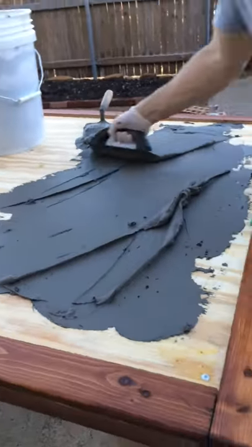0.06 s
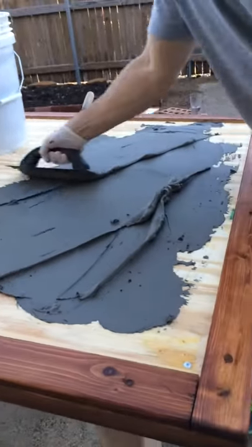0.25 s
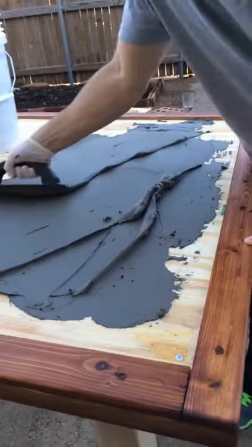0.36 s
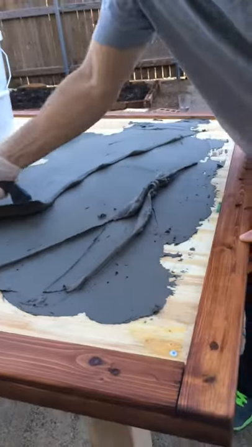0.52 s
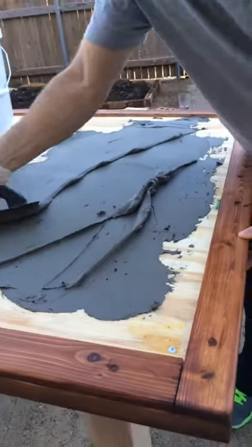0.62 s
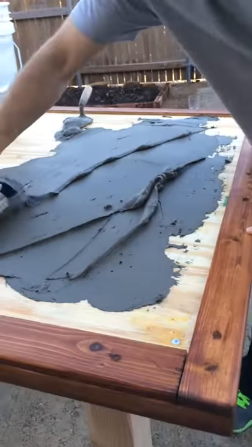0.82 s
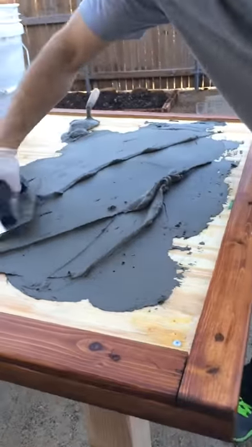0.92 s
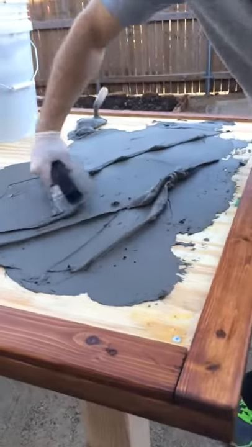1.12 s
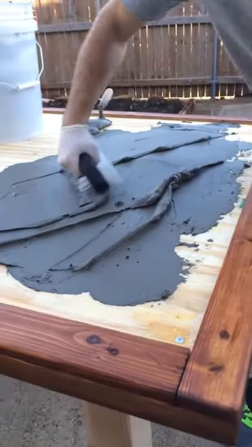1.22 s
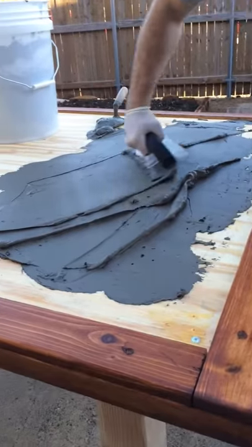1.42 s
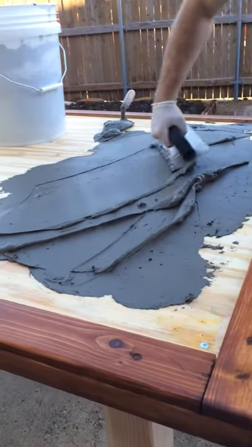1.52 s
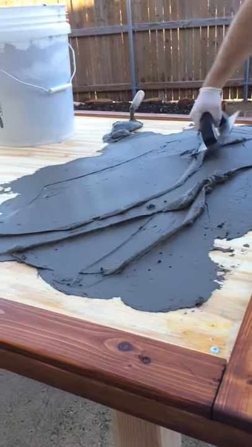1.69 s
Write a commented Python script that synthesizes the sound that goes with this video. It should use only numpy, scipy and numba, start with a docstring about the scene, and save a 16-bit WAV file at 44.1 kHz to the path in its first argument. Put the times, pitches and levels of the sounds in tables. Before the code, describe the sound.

A steel trowel scrapes through wet cement on a wooden table, sand crackling and hissing under the blade. It drags back more softly, groaning twice with dull table knocks. A faint outdoor rumble and hum lie behind.

```python
"""Trowel in wet cement

A steel trowel is pushed through gritty cement on a plywood table in a yard, then drawn back on edge.
Sand crackles and hisses under the blade and rings the steel, over a hollow rasp and dull table knocks.
On the way back the edge sticks and slips, groaning twice. A faint rumble and hum lie behind."""
import sys
import numpy as np
from scipy import signal
from scipy.fft import rfft, irfft
from scipy.io import wavfile
from scipy.ndimage import uniform_filter1d
from numba import njit

SR = 44100
rng = np.random.default_rng(int(sys.argv[2]) if len(sys.argv) > 2 else 0)


def unload_wav(signal):
    """Save mono or channel-first audio to the path in sys.argv[1] as 16-bit WAV at rate SR, clipped to [-1, 1]."""
    wavfile.write(
        sys.argv[1],
        SR,
        np.round(np.clip(np.atleast_2d(signal).T, -1, 1) * 32767).astype(np.int16),
    )


N = 77175
TIME_S = np.arange(N) / SR


def undb(db):
    """Decibels to gain."""
    return 10 ** (np.asarray(db) / 20)


def unit(x):
    """Scale to rms 1."""
    return x / np.sqrt(np.mean(x ** 2) + 1e-20)


def curve(rows):
    """Join (s, value) rows by straight lines."""
    return np.interp(TIME_S, *np.array(rows, float).T)


def envelope(rows):
    """Gain from (s, dB) rows, dying quickly outside them."""
    outside_s = np.maximum(rows[0][0] - TIME_S, 0) + np.maximum(TIME_S - rows[-1][0], 0)
    return undb(curve(rows)) * np.exp(-outside_s / 0.0071)


def wander(per_s):
    """Smooth random drift at rms 1."""
    hold = max(int(SR / per_s), 2)
    steps = np.repeat(rng.standard_normal(N)[:N // hold + 1], hold)
    return unit(uniform_filter1d(steps, hold)[:N])


def colour(x, points):
    """Minimum-phase filter from (Hz, dB) points; keeps the power of white noise."""
    hz, db = np.array(points, float).T
    bins_hz = np.arange(2049) * SR / 4096
    gain = undb(np.interp(np.log(bins_hz + 1), np.log(hz), db))
    cepstrum = irfft(np.log(gain))
    half = len(cepstrum) // 2
    cepstrum[1:half] *= 2
    cepstrum[half + 1:] = 0
    response = irfft(np.exp(rfft(cepstrum)))
    return signal.fftconvolve(x, response / np.linalg.norm(response))[:N]


@njit
def bandpass(x, hz, width_hz):
    """State-variable band-pass with a moving centre."""
    y = np.empty(len(x))
    band_state, low_state = 0., 0.
    for i in range(len(x)):
        g = np.tan(np.pi * hz[i] / SR)
        damping = width_hz / hz[i]
        band = (band_state + g * (x[i] - low_state)) / (1 + g * (g + damping))
        band_state = 2 * band - band_state
        low_state += 2 * g * band
        y[i] = damping * band
    return y


def ring(x, hz, width_hz):
    """Steep resonance: two band-passes in series, at rms 1."""
    hz, width_hz = hz * np.ones(N), float(width_hz)
    return unit(bandpass(bandpass(x, hz, width_hz), hz, width_hz))


def grains(per_s, spread_db):
    """Random tiny impacts, mostly small, a few large."""
    hits = rng.random(N) < per_s / SR
    size = undb(spread_db * np.minimum(rng.exponential(size=N), 5))
    return unit(hits * size * np.sign(rng.standard_normal(N)))


def sand(hiss_db=-3.5):
    """Grains crushed under the steel, over the hiss of the paste."""
    return unit(grains(per_s=5000, spread_db=3) + undb(hiss_db) * rng.standard_normal(N))


def scrape(catch_db=0.8, catches_per_s=190):
    """Both strokes; the level flickers as the blade catches and slips."""
    grit = push() + pull() + fizz()
    friction = rub() + uneven_contact(grit) + rasp()
    return friction * unit(undb(catch_db * wander(catches_per_s)))


# Push effort. Each row: time in seconds, relative level in dB.
PUSH_EFFORT = [(0, -40.5), (.03, -47.5), (.135, -54), (.156, -42.5), (.19, -44.5), (.222, -46),
               (.243, -34.5), (.282, -35.5), (.308, -25.5), (.352, -36), (.404, -32.5), (.478, -40.5),
               (.515, -44), (.544, -28.5), (.566, -39), (.592, -28.5), (.61, -31.5), (.63, -26),
               (.67, -21.5), (.72, -28), (.732, -39), (.765, -32), (.812, -42.5), (.87, -30.5),
               (.905, -41.5), (.918, -51.5), (.955, -65)]
# Sand spectrum in the push. Each row: frequency in Hz, relative level in dB.
PUSH_SPECTRUM = [(150, -28), (330, -12), (640, -8.5), (1050, -1.5), (1900, -0.5), (2700, 0.5), (4300, -1.5),
                 (5400, -1.5), (7500, -1), (11500, -3.5), (13500, -8.5), (15500, -20)]


def push(choke_db=-24.5, gain_db=-0.5):
    """The blade ploughs through sand; at efforts above choke_db the paste damps the steel."""
    effort = envelope(PUSH_EFFORT)
    ring_gain = 1 / np.hypot(1, effort / undb(choke_db))
    return (colour(sand(), PUSH_SPECTRUM) + ring_gain * steel("push")) * effort * undb(gain_db)


# Pull effort. Each row: time in seconds, relative level in dB.
PULL_EFFORT = [(.96, -64.5), (1.06, -57.5), (1.125, -63.5), (1.172, -51), (1.188, -62.5), (1.203, -39),
               (1.25, -51), (1.33, -46), (1.42, -44), (1.488, -42), (1.505, -49.5), (1.525, -39),
               (1.56, -42), (1.592, -59.5), (1.61, -56.5), (1.68, -52.5), (1.715, -65.5)]
# Sand spectrum in the pull. Each row: frequency in Hz, relative level in dB.
PULL_SPECTRUM = [(150, -21), (450, -8), (950, 4), (1500, -0.5), (2400, 2), (3500, -2), (4500, -4),
                 (7000, -4), (11000, -9.5), (15500, -12)]


def pull(gain_db=1.5):
    """The edge drags back over the sand, the steel ringing freely."""
    return (colour(sand(), PULL_SPECTRUM) + steel("pull")) * envelope(PULL_EFFORT) * undb(gain_db)


# Blade modes. Each row: frequency in Hz, width in Hz, push gain in dB, pull gain in dB.
BLADE_MODES = [(942, 130, -45, -10), (1446, 156, -9.5, -16.5), (1853, 300, -21, -14),
               (2368, 460, -9, -11.5), (3570, 800, -11, -35), (4380, 620, -13, -43), (5720, 1000, -24, -14),
               (6600, 2100, -13.5, -34)]


def steel(stroke):
    """Sand rings the modes of the blade."""
    return sum(undb(push_db if stroke == "push" else pull_db) * ring(sand(), hz, width_hz)
               for hz, width_hz, push_db, pull_db in BLADE_MODES)


def uneven_contact(x, depth_db=1.5, patches_per_s=55):
    """Overlapping bands swell independently as the contact wanders along the edge."""
    centres_hz = (1000, 2000, 3000, 4500, 6500, 9500, 14000)
    spectrum, hz = rfft(x), np.fft.rfftfreq(N, 1 / SR)
    out = np.zeros(N)
    for weights in np.eye(len(centres_hz)):
        band = irfft(spectrum * np.interp(hz, centres_hz, weights), N)
        out += band * unit(undb(depth_db * wander(patches_per_s)))
    return out


# Rasp envelope. Each row: time in seconds, relative level in dB.
RASP_LEVEL = [(0, -40.5), (.13, -59), (.16, -34.5), (.19, -50), (.205, -41), (.228, -37.5), (.247, -29),
              (.29, -34), (.316, -30), (.345, -31), (.37, -33.5), (.47, -35.5), (.545, -35), (.58, -35.5),
              (.594, -23.5), (.608, -51), (.622, -33), (.692, -20), (.73, -35.5), (.9, -40.5), (.92, -45)]
# Resonance pair of the hollow. Each row: time in seconds, centre in Hz, spacing in Hz.
HOLLOW_TUNING = [(0, 1230, 250), (.28, 1376, 80), (.45, 1210, 270), (.55, 1380, 443), (.65, 1610, 418),
                 (.695, 1860, 298), (.76, 1640, 640), (.9, 1380, 503)]


def rasp(width_hz=500, gain_db=-3):
    """Grit rings the hollow under the blade: two resonances rise as it bites and part as it tilts."""
    tuning = np.array(HOLLOW_TUNING)
    centre_hz, spacing_hz = curve(tuning[:, [0, 1]]), curve(tuning[:, [0, 2]])
    pair = sum(ring(grains(per_s=5000, spread_db=3), hz, width_hz)
               for hz in (centre_hz - spacing_hz / 2, centre_hz + spacing_hz / 2))
    return unit(pair) * envelope(RASP_LEVEL) * undb(gain_db)


# Fizz envelope. Each row: time in seconds, level in dB.
FIZZ_LEVEL = [(0, -48), (.135, -53), (.157, -44), (.21, -40), (.31, -36), (.4, -40), (.5, -41),
              (.543, -26.5), (.565, -34.5), (.62, -34), (.86, -50), (.915, -81), (1.3, -64), (1.41, -47),
              (1.57, -58)]


def fizz():
    """Fine wet fizz where the blade only skims the paste."""
    return ring(sand(), hz=12900, width_hz=20000) * envelope(FIZZ_LEVEL)


# Rub envelope. Each row: time in seconds, level in dB.
RUB_LEVEL = [(.22, -70), (.3, -39.5), (.38, -55), (.6, -81), (.69, -50), (.735, -45.5), (.77, -42.5),
             (.88, -52), (.92, -69)]


def rub():
    """Low rub on the table top where the paste is thin."""
    return ring(sand(), hz=644, width_hz=590) * envelope(RUB_LEVEL)


# Coarse grains breaking. Each row: start in seconds, relative level in dB, tilt in dB per octave.
GRAIN_CRACKS = [(.0773, -31, 1), (.158, -23, 2), (.1698, -28, 3), (.3015, -17, -1), (.426, -22, 1),
                (.5412, -17, -1), (.5472, -17, -1), (.6605, -12, -1), (.673, -10, -3), (.6855, -11, -7),
                (.7045, -18, -5), (.8385, -23, -1), (1.329, -29, -6)]
# Crack spectrum before the tilt. Each row: frequency in Hz, relative level in dB.
CRACK_SPECTRUM = [(200, -19), (1000, 0), (1800, 7.5), (4500, 10), (8000, 13), (15000, 7)]


def cracks(decay_s=.0006, gain_db=-3):
    """Coarse grains burst one at a time: sharp at the bare edge, dull under the blade."""
    out = np.zeros(N)
    for start, db, tilt in GRAIN_CRACKS:
        force = undb(db) * (TIME_S >= start) * np.exp(-np.abs(TIME_S - start) / decay_s)
        spectrum = [(hz, level + tilt * np.log2(hz)) for hz, level in CRACK_SPECTRUM]
        out += colour(force * rng.standard_normal(N), spectrum)
    return out * undb(gain_db)


# Edge judders. Each row: start, rise and hold in seconds, decay in dB per second, level in dB.
EDGE_JUDDERS = [(.974, 0.043, 0.11, 60.5, -32), (1.172, 0.066, 0.06, 191, -30.5)]
# Blade and table modes. Each row: frequency and width in Hz, relative dB in judder one and two.
JUDDER_MODES = [(488, 41, -6, 4.5), (536.5, 34, -12, 2), (598, 52, -3, -0.5), (703, 136, 0, -1.5),
                (797, 68, -3, -8), (891, 37, -1.5, 4), (1004, 26.4, -1.5, 2), (1155, 55, -13, -4),
                (1244, 42, -10, -0.5), (1325, 75, -10.5, -11), (1366.4, 61, -9.5, -1.5),
                (1566, 120, -6, -7.5), (2204, 220, -20, -12)]
SLIPS_PER_S, SLIP_SPREAD_DB = 710, 2


def judder():
    """Irregular slips of the edge drive the resonances of blade and table."""
    out = np.zeros(N)
    for k, (start, rise, hold, decay, db) in enumerate(EDGE_JUDDERS):
        slips = grains(SLIPS_PER_S, SLIP_SPREAD_DB)
        body = sum(undb(mode_db[k]) * ring(slips, hz, width) for hz, width, *mode_db in JUDDER_MODES)
        attack = np.clip((TIME_S - start) / rise, 0, 1)
        level_db = db - decay * np.maximum(TIME_S - start - rise - hold, 0)
        out += unit(body) * attack * undb(level_db)
    return out


# Edge squeals. Each row: start and rise in seconds, decay in dB per second, pitch in Hz, level in dB.
EDGE_SQUEALS = [(0.971, 0.078, 92, 662, -26), (1.185, 0.045, 190, 963, -31.5),
                (1.205, 0.035, 330, 904, -33), (1.294, 0.019, 130, 904, -31)]


def squeal(pitch_drift=.004, flutter_db=1.8, overtone_db=-25.5):
    """The edge locks onto one resonance and sings briefly; overlapping tones beat."""
    out = np.zeros(N)
    for start, rise, decay, hz, db in EDGE_SQUEALS:
        phase = 2 * np.pi * np.cumsum(hz * (1 + pitch_drift * wander(per_s=120))) / SR
        tone = np.sqrt(2) * (np.sin(phase) + undb(overtone_db) * np.sin(2 * phase))
        attack = np.clip((TIME_S - start) / rise, 0, 1)
        level_db = db - decay * np.maximum(TIME_S - start - rise, 0)
        out += tone * attack * undb(level_db + flutter_db * wander(per_s=130))
    return out


# Whine in the first judder. Each row: time in seconds, pitch in Hz, level in dB.
WHINE_GLIDE = [(.975, 1865, -53), (1.035, 1781, -39), (1.1, 1765, -43), (1.16, 1733, -50), (1.2, 1690, -65)]
# Steel partials. Each row: ratio to the pitch, width in Hz, relative level in dB.
STEEL_PARTIALS = [(.935, 65, 0), (1, 60, 0), (1.2, 260, -7), (1.47, 280, -6)]


def whine():
    """Slips ring a rough cluster of steel partials that sag together as the edge settles."""
    glide = np.array(WHINE_GLIDE)
    pitch_hz, gain = curve(glide[:, [0, 1]]), envelope(glide[:, [0, 2]])
    slips = grains(SLIPS_PER_S, SLIP_SPREAD_DB)
    cluster = sum(undb(db) * ring(slips, ratio * pitch_hz, width) for ratio, width, db in STEEL_PARTIALS)
    return unit(cluster) * gain


# Wet touches. Each row: start in seconds, level in dB.
WET_DABS = [(1.604, -42.5), (1.626, -46), (1.669, -47.5)]


def dabs(decay_s=0.012):
    """Light touches ring the blade as it leaves the paste."""
    touches = sum(undb(db) * (TIME_S >= start) * np.exp(-np.abs(TIME_S - start) / decay_s)
                  for start, db in WET_DABS)
    return unit(steel("pull")) * touches


# Table knocks. Each row: start in seconds, peak level in dB.
TABLE_KNOCKS = [(0.524, -44.5), (1.005, -34), (1.144, -38), (1.314, -40)]


def knocks(hz=75, rise_s=.018):
    """The table top sways in its lowest mode under the arm."""
    out = np.zeros(N)
    for start, db in TABLE_KNOCKS:
        age_s = np.maximum(TIME_S - start, 0)
        swell = age_s / rise_s * np.exp(1 - age_s / rise_s)
        out += undb(db) * swell * np.sin(2 * np.pi * hz * age_s)
    return out


def reflections(x, delay_s=0.00067, t60_s=0.13, echo_db=-20):
    """Add short, faint reflections from table and fence."""
    t = np.arange(SR // 2) / SR
    tail = rng.standard_normal(len(t)) * (t > delay_s) * np.exp(-np.log(1000) * t / t60_s)
    tail = signal.lfilter([1], [1, -.6], tail)  # softens the treble
    return x + undb(echo_db) * signal.fftconvolve(x, tail / np.linalg.norm(tail))[:N]


# Yard rumble. Each row: frequency in Hz, relative level in dB.
RUMBLE_SPECTRUM = [(20, -31), (32, -7), (48, -8.5), (75, 2.5), (125, 0), (175, -4.5), (260, -14.5),
                   (500, -17.5), (1200, -20), (3000, -38.5), (8000, -48), (15500, -39)]
# Hum tones. Each row: frequency in Hz, level in dB.
HUM_TONES = [(74, -57), (121, -50)]


def yard(rumble_db=-45, waver_db=2, pitch_drift=0.018):
    """Distant rumble with a wavering hum."""
    hum = np.zeros(N)
    for hz, db in HUM_TONES:
        gain = undb(db + waver_db * wander(per_s=6.3))
        phase = 2 * np.pi * np.cumsum(hz * (1 + pitch_drift * wander(per_s=14))) / SR
        hum += np.sqrt(2) * gain * np.sin(phase)
    return hum + undb(rumble_db) * unit(colour(rng.standard_normal(N), RUMBLE_SPECTRUM))


def scene():
    """Trowel, table and yard in mono."""
    trowel = scrape() + cracks() + judder() + whine() + squeal() + dabs()
    return (reflections(trowel) + knocks() + yard())[None]


def record(dry):
    """Steep low-pass on the whole mix."""
    cutoff_hz = 15500
    return signal.sosfilt(signal.ellip(10, .2, 80, cutoff_hz, fs=SR, output="sos"), dry)


dry = scene()
out = record(dry)
unload_wav(out)
```